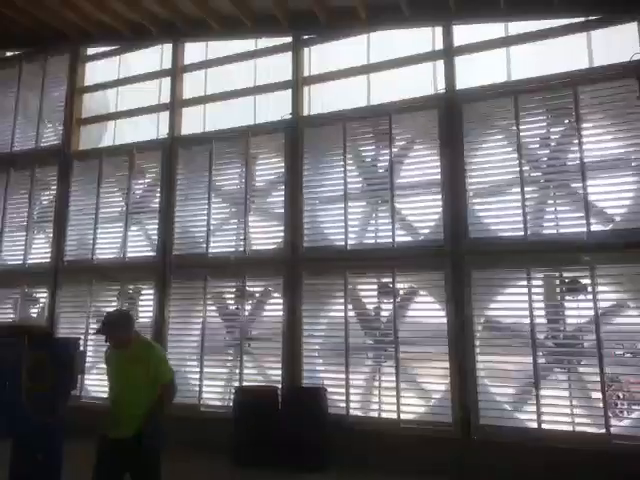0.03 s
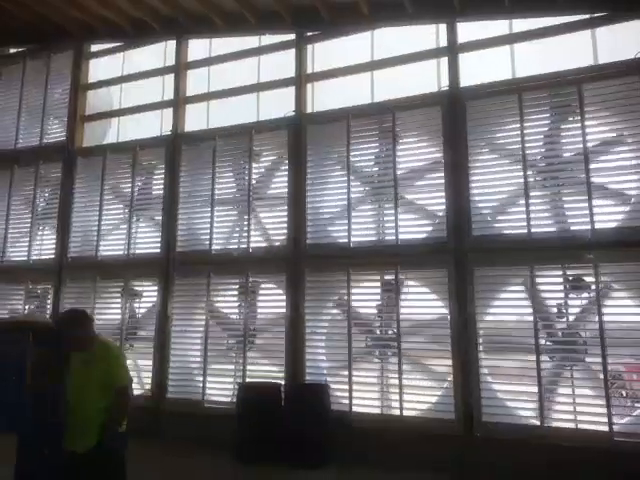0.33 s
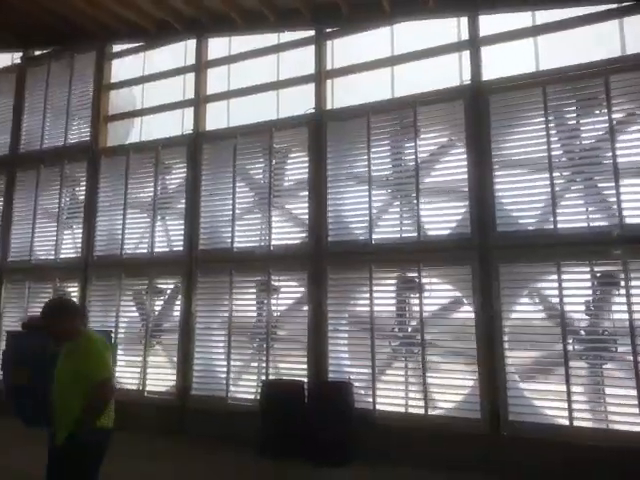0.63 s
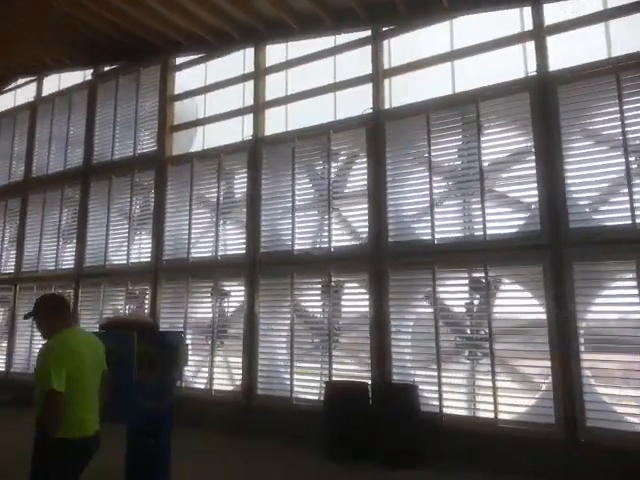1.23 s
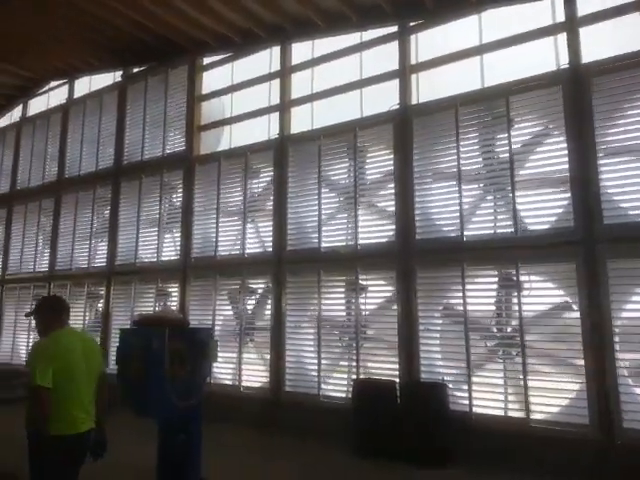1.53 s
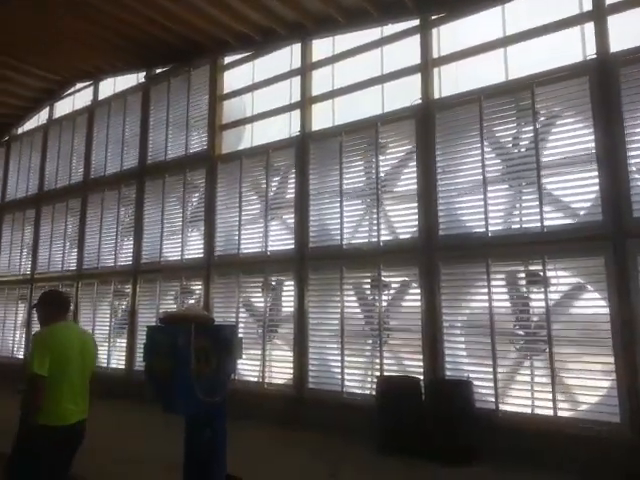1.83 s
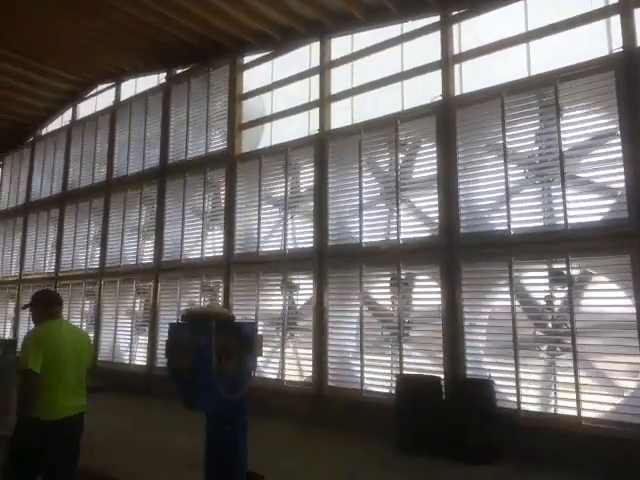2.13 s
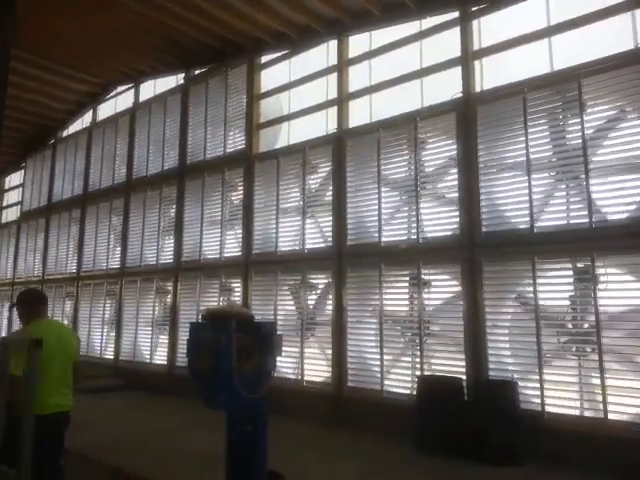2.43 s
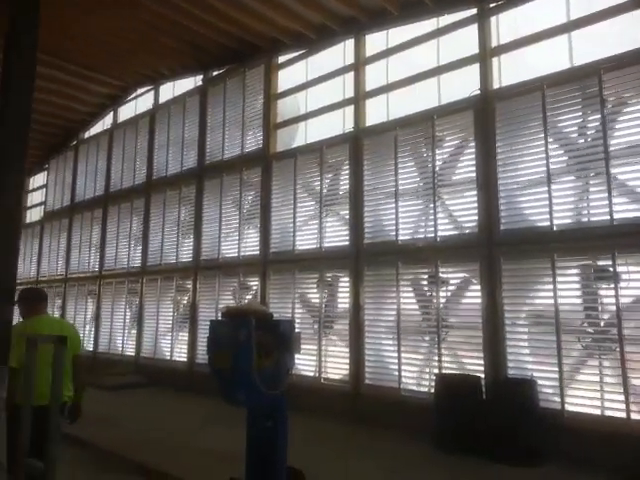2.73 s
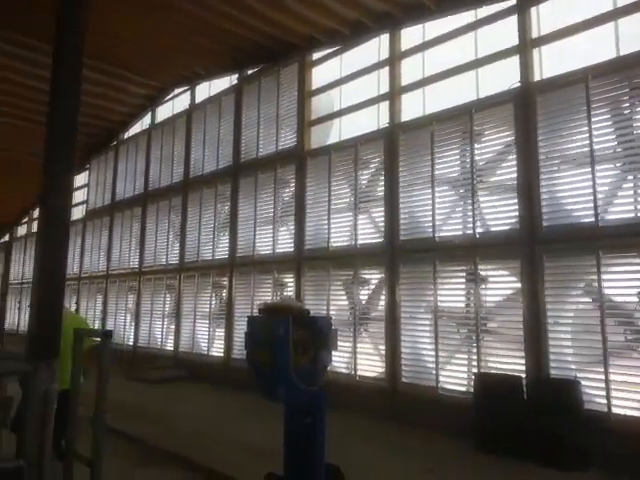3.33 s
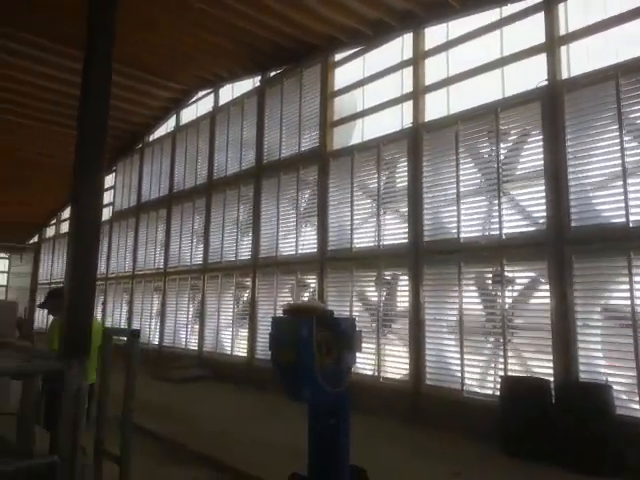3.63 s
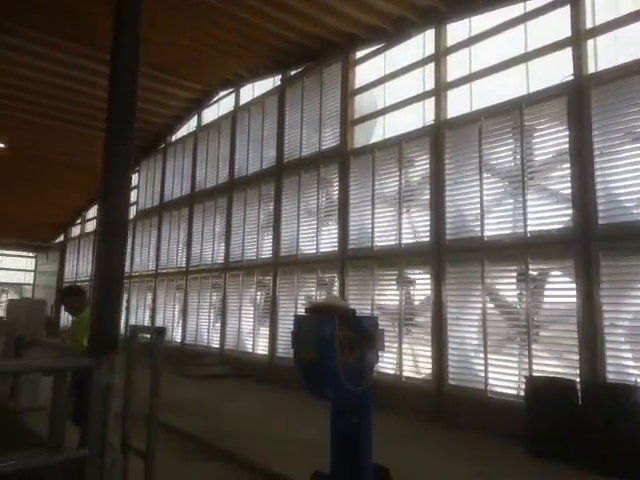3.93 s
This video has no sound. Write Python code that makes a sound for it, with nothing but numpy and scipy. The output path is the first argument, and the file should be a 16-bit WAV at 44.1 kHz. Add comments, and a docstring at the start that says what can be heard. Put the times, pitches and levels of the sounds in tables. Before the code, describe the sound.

A wall of large fans running, a low steady roar with air hissing through shutters.

```python
"""Big exhaust fans in a barn

After a short silence, a wall of fans fades in. Air roars through the blades and hisses through the
shutters, over a blade hum whose tones swell and sink. The sound drifts slightly to the right as the
two microphones slowly turn. One knock on the right microphone makes a limiter dip the level briefly."""
import sys
import numpy as np
from scipy import signal
from scipy.fft import rfft, irfft
from scipy.io import wavfile
from scipy.ndimage import uniform_filter1d, minimum_filter1d

SR = 44100
rng = np.random.default_rng(int(sys.argv[2]) if len(sys.argv) > 2 else 0)


def inscribe(sig):
    """Save sig as 16-bit PCM at rate SR to the path in sys.argv[1].

    A 1-D sig is mono; a 2-D sig holds one channel per row.
    Samples are clipped to [-1, 1] before scaling.
    """
    pcm = np.round(np.clip(np.atleast_2d(sig).T, -1, 1) * 32767)
    wavfile.write(sys.argv[1], SR, pcm.astype(np.int16))


N = 176400

BLADE_HZ, WOBBLE_HZ = 31.12, 0.075  # blades passing per second, and how far that rate wanders

# The hum tones that swell and sink, as multiples of the blade rate.
SWELLING_TONES = (3, 4, 5, 7, 8)
# How they swell. Each row: time in seconds, then a relative level in dB for each of the five tones.
TONE_SWELLS = [(0.5, -39, -20, -31, -37, -23.5), (0.75, -36, -20.5, -33, -28, -39),
               (1.2, -31, -24, -37, -26, -30), (1.55, -35, -33, -35, -27, -39),
               (1.85, -32, -37, -33, -26, -39), (2.25, -39, -27, -33, -26, -28),
               (2.6, -33, -22.5, -26, -38, -29), (2.92, -25.5, -18.5, -31, -27, -33),
               (3.22, -31, -26, -33, -29, -35), (3.48, -25, -24, -24, -29, -38),
               (3.68, -26, -26, -26, -27, -39), (3.87, -24, -28, -20.5, -26, -31)]
# The steady hum tones, as multiples of the blade rate, and their relative levels in dB.
STEADY_TONES = (1, 2, 6, 9, 10)
STEADY_TONE_DB = (-54.5, -37, -54.5, -40, -44)
# The tone color of the roar. Each row: frequency in Hz, relative level in dB.
ROAR_COLOR = [(12, -32), (25, -33.5), (50, -12), (95, -3), (125, -1.5), (185, -0.5), (280, -1.5), (370, -5),
              (460, -9.5), (570, -7.5), (680, -9.5), (950, -17.5), (1400, -17.5), (3000, -28.5),
              (9000, -69), (11500, -100)]
# Surges and lulls of the roar. Each row: time in seconds, level change in dB.
ROAR_SURGES = [(0.7, 1), (1.13, -0.5), (1.25, 1.1), (1.55, 0), (2.2, 0.4), (2.72, 0), (2.82, 0),
               (2.91, 0.9), (3.15, 0.5), (3.24, -2), (3.31, 0.5), (3.65, 0.4), (3.81, 0), (3.95, -0.6)]
# The tone color of the hiss at each microphone. Each row: frequency in Hz, relative level in dB.
HISS_COLOR_LEFT = [(800, -32), (1450, -14.5), (1830, -1.5), (2100, 2), (2450, -1.5), (3050, -12.5),
                   (3450, -13), (4100, -11.5), (5400, -12), (6200, -16.5), (7800, -23.5), (9300, -33.5),
                   (10500, -57), (11500, -78.5)]
HISS_COLOR_RIGHT = [(800, -23), (1500, -9.5), (1900, -0.3), (2130, 2), (2450, -4.5), (3100, -17.5),
                    (4200, -13.5), (5400, -16), (6200, -13), (7800, -18.5), (9300, -21), (10800, -38),
                    (12200, -69)]
# Small swells of the hiss. Each row: time in seconds, level change in dB.
HISS_SURGES = [(0.5, 0.5), (0.8, 0.5), (0.98, 0.5), (1.09, 0), (1.17, 0.14), (2.25, 0.2), (2.55, -0.4),
               (2.8, 0.1), (2.87, -0.1), (3.1, 0), (3.3, -0.5), (3.9, 0)]
# How alike the two microphones sound. Each row: frequency in Hz, likeness from 0 (unrelated) to 1.
MIC_LIKENESS = [(30, .4), (70, 0.21), (130, 0.57), (260, 0.88), (680, 0.94), (900, 0.64), (1200, 0.42),
                (1700, 0.42), (2000, .1), (2300, 0.26), (3000, .08), (6000, .01)]
# How far the wave at the left microphone is ahead. Each row: frequency in Hz, lead in radians.
LEFT_LEAD = [(30, 0), (300, 0.24), (860, 0.57), (1200, 1.5), (1600, 3), (2200, 0.12)]


def amp(db):
    """Turns decibels into a factor to multiply a sound by."""
    return 10 ** (np.asarray(db) / 20)


def unit(x):
    """Scales a signal to an average strength (rms) of 1."""
    return x / np.sqrt(np.mean(x ** 2) + 1e-20)


def look_up(table, hz):
    """Reads between the rows of a table, with every octave equally wide."""
    row_hz, values = np.transpose(table)
    return np.interp(np.log(hz + 1), np.log(row_hz + 1), values)


def volume_curve(table):
    """Joins rows of seconds and dB into a volume factor for every sample."""
    return amp(np.interp(np.arange(N) / SR, *np.transpose(table)))


def drift(rate_hz):
    """A smooth random wandering of strength 1, with little movement faster than rate_hz."""
    hz = np.fft.rfftfreq(N, 1 / SR)
    noise = rfft(rng.standard_normal(N))
    return unit(irfft(noise * np.exp(-(hz / rate_hz) ** 2) * (hz > 0), N))


def barn_noise(left_color, right_color):
    """The noise of swirling air fills the barn and reaches two nearby microphones partly alike."""
    hz = np.fft.rfftfreq(N, 1 / SR)
    left, unrelated = rfft(rng.standard_normal((2, N)))
    likeness = look_up(MIC_LIKENESS, hz)
    right = likeness * left + np.sqrt(1 - likeness ** 2) * unrelated
    right *= np.exp(-1j * look_up(LEFT_LEAD, hz))  # arrives a little later
    left *= amp(look_up(left_color, hz))
    right *= amp(look_up(right_color, hz))
    return np.array([unit(irfft(left, N)), unit(irfft(right, N))])


def microphone_knock(start_s=1.0287, pitch_hz=190, rise_s=0.000013, decay_s=0.0024):
    """A knock gives the right microphone a sharp push and a slower rebound."""
    age = np.maximum(np.arange(N) / SR - start_s, 0)
    rise = 1 - np.exp(-age / rise_s)
    rebound = np.cos(2 * np.pi * pitch_hz * age) * np.exp(-age / decay_s)
    return amp(15) * rise * rebound * np.array([[0.01], [1]])  # a trace leaks to the left


def shutter_hiss(left_db=-21, right_db=-25.5, flutter_db=0.34):
    """Air rushes through the shutter slats and hisses, most strongly around 2100 Hz."""
    flow = volume_curve(HISS_SURGES) * amp(flutter_db * drift(rate_hz=18))
    return amp([[left_db], [right_db]]) * flow * barn_noise(HISS_COLOR_LEFT, HISS_COLOR_RIGHT)


def blade_hum(speed_spread=0.00705, others_db=-23):
    """The nearest fan hums at multiples of its blade rate; a slower and a faster fan make it waver."""
    t = np.arange(N) / SR
    times, *swells_db = np.transpose(TONE_SWELLS)
    gains = [amp(np.interp(t, times, db)) for db in swells_db] + list(amp(STEADY_TONE_DB))
    hum = np.zeros(N)
    for offset, fan_db in ((0, 0), (-speed_spread, others_db), (speed_spread, others_db)):
        blades_passed = np.cumsum(BLADE_HZ * (1 + offset) + WOBBLE_HZ * drift(rate_hz=1.7)) / SR
        for multiple, gain in zip(SWELLING_TONES + STEADY_TONES, gains):
            hum += amp(fan_db) * gain * np.sin(2 * np.pi * (multiple * blades_passed + rng.random()))
    return hum


def blade_throb(depth):
    """Each passing blade pushes a puff of air, so the volume pulses."""
    blades_passed = np.cumsum(BLADE_HZ + WOBBLE_HZ * drift(rate_hz=1.5)) / SR
    return 1 + depth * np.cos(2 * np.pi * blades_passed)


def blade_roar():
    """The blades churn the air into a low roar that surges and throbs a little."""
    flow = volume_curve(ROAR_SURGES) * blade_throb(depth=0.089)
    return amp(-16) * flow * barn_noise(ROAR_COLOR, ROAR_COLOR)


def scene(lean_db=0.56, turn_db_per_s=-0.1):
    """Mixes the knock with the fans, which shift to the right as the microphones turn."""
    side = np.array([[1], [-1]])  # raises the left channel and lowers the right
    low_sounds = amp(2.5) * blade_hum() + blade_roar()
    fans = low_sounds * amp(side * lean_db) + shutter_hiss()  # hum and roar lean to the left
    turn_db = turn_db_per_s * (np.arange(N) - N / 2) / SR
    return fans * amp(side * turn_db) + microphone_knock()


def record(dry, ceiling_db=-0.4, hold_s=0.0077, recover_db_per_s=2500, top_hz=14800):
    """Fades in, turns both channels down at loud peaks (a limiter) and cuts the highest treble."""
    t = np.arange(N) / SR
    faded = dry * np.interp(t, [0.39, 0.68], [0.053, 1], left=0)  # silent until 0.39 seconds
    peak_db = 20 * np.log10(abs(faded).max(0) + 1e-9)
    excess_db = np.maximum(peak_db - ceiling_db, 0)
    # The dip starts just before a peak, holds for a moment, then lets go at a steady rate.
    ahead, half_hold = 8, int(hold_s * SR / 2)  # in samples
    held_db = -minimum_filter1d(-excess_db, 2 * half_hold + 1, origin=half_hold - ahead)
    smooth_db = uniform_filter1d(held_db, 2 * ahead)
    recovery_db = recover_db_per_s * t
    dip_db = np.maximum.accumulate(smooth_db + recovery_db) - recovery_db
    treble_cut = signal.firwin(255, top_hz, window=("kaiser", 8), fs=SR)
    return signal.oaconvolve(faded / amp(dip_db), treble_cut[None], "same")


dry = scene()
out = record(dry)
inscribe(out)
```